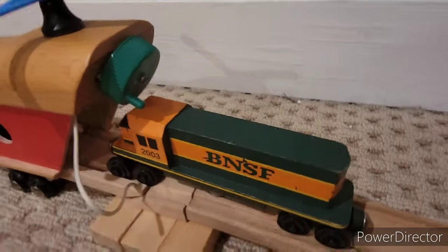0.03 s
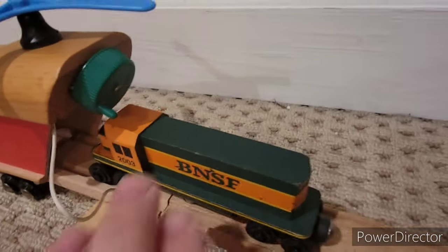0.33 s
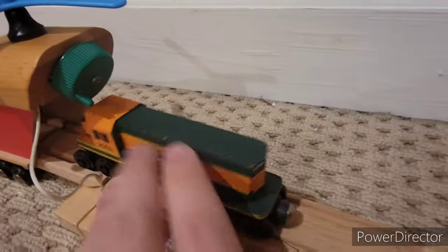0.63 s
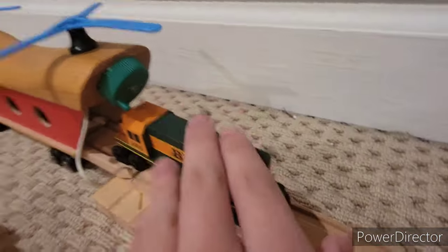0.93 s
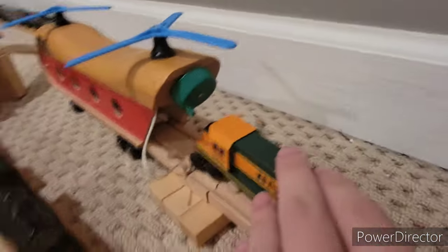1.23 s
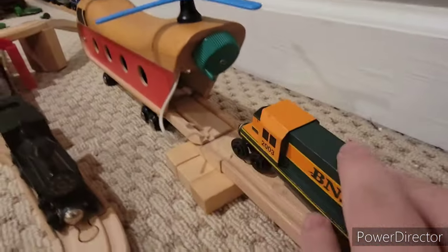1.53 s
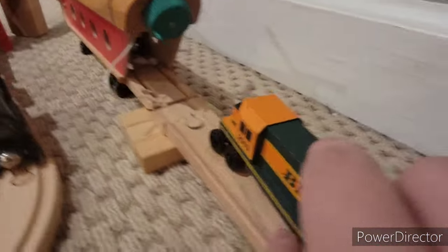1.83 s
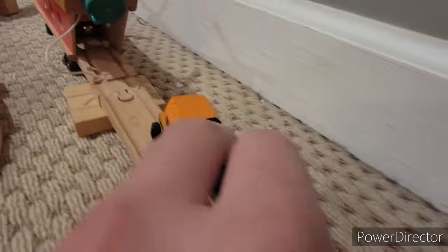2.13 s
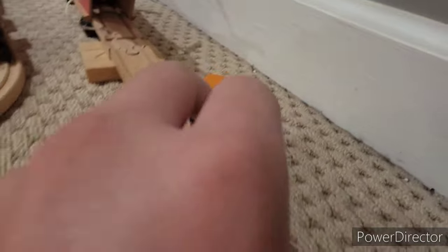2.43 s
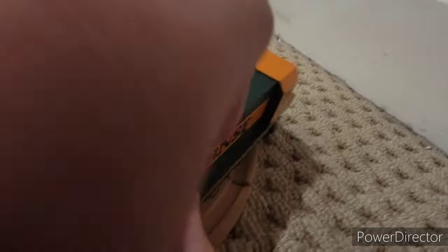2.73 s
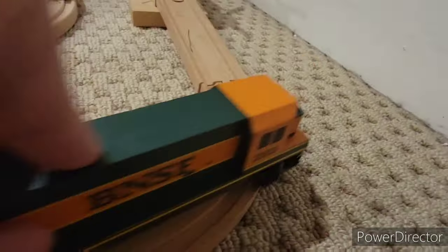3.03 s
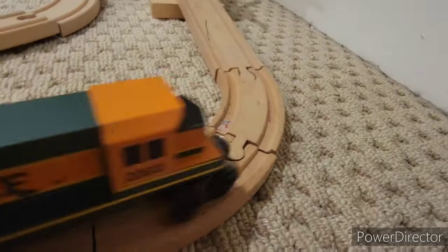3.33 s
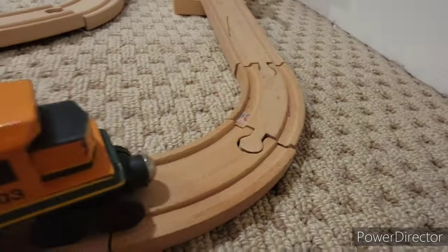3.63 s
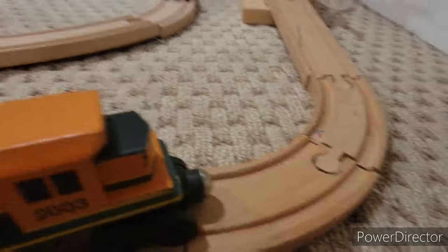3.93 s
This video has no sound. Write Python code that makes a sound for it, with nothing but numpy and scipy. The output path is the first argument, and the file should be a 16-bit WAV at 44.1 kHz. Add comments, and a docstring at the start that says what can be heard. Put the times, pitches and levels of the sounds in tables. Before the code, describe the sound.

A wooden toy train rolls along a wooden track after light handling clicks and a few deep bumps. Its wheels rattle and squeak in fits, knock over a joint, then fade, close by in a quiet carpeted room.

```python
"""A quiet room hums, and a hand brushes and clicks against a wooden toy engine as it takes hold.
From about 1.4 s the hand bears down with deep bumps and pushes the toy closer along a wooden track
on a carpet. The wheels rumble and rattle in their grooves, and from 1.8 s a dry axle squeaks in fits.
Just after 3 s the wheels scrape along a bend. Near 3.4 s they cross a joint with a light knock and
two hard ones, while the squeaks are at their loudest. Then the rolling fades."""
import sys
import numpy as np
from scipy import signal
from scipy.fft import rfft, irfft
from scipy.io import wavfile

SR = 44100
rng = np.random.default_rng(int(sys.argv[2]) if len(sys.argv) > 2 else 0)


def transcribe(u):
    """Save the signal u as a 16-bit wav file named by the first command-line argument.

    u: samples, shape (n,) or (channels, n), limited to [-1, 1]; the rate is SR.
    q: integer samples, one column per channel.
    """
    v = np.clip(np.atleast_2d(u).T, -1, 1)
    q = np.round(v * 32767).astype(np.int16)
    wavfile.write(sys.argv[1], SR, q)


N = 176400
T = np.arange(N) / SR
HZ = np.maximum(np.arange(N // 2 + 1) * SR / N, 1)

# Low rumble of the room: pitch_hz, gain_db
ROOM_COLOUR = [(25, -31), (50, -11), (130, -4), (180, -11.5), (260, -16), (420, -27), (850, -23),
               (1500, -33.5)]
# Low hums of the room, once fully grown: pitch_hz, width_hz, level_db
ROOM_HUMS = [(60.3, 19, -51.5), (103.7, 21, -42.5)]
# Loudness of the faint hiss: time_s, level_db
HISS_LEVELS = [(0, -68.5), (.55, -71.5), (1.4, -61), (2.2, -65.5), (2.7, -52), (3.5, -66), (4, -60)]
# Tone of that hiss: pitch_hz, gain_db
HISS_COLOUR = [(700, 4), (3000, 2), (7000, -3.5), (8500, -22), (15000, -12.5)]
# Brushes of hand and sleeve: peak_s, rise_s, fall_s, level_db, pitch_hz
HAND_BRUSHES = [(.335, 0.068, 0.023, -52.5, 2230), (.68, 0.013, 0.037, -61, 1900),
                (0.794, 0.0094, 0.039, -52, 2880), (1.337, 0.018, 0.0084, -53.5, 4300),
                (2.389, 0.017, 0.023, -46.5, 1240)]
# Bumps, deep as the hand bears down, hollow as a wheel drops: start_s, level_db, pitch_hz
DULL_BUMPS = [(1.417, -30, 69), (1.518, -33.5, 67), (1.6, -31.5, 65.5), (1.843, -34, 523),
              (1.889, -33.5, 442), (1.94, -34, 380), (2.03, -32, 538)]
# Clicks of fingers, couplings and wheels: start_s, level_db, pan_db, ring_hz, ring_db (before a boost)
# In every table, pan_db above 0 is to the left.
WOOD_CLICKS = [(0.779, -32, -0.5, 3570, -5.5), (0.84, -39.5, -5, 3270, -2.5), (1.842, -37.5, -2, 5600, -14),
               (1.891, -43.5, -10, 1810, -3), (1.939, -41, 0, 6310, -16), (2.0297, -33, -4, 2150, -12.5),
               (2.1053, -62, -13, 3950, 18), (2.3786, -34, -15, 1330, -7), (2.524, -27.5, 1, 3350, -15),
               (2.630, -23.5, -2.5, 3730, -13), (2.6928, -38, -4, 7120, 1.5),
               (2.9071, -29.5, -12, 1310, -8), (3.016, -33.5, -11.5, 1420, -2),
               (3.134, -28.5, 2, 3400, -16.5), (3.312, -40, -5, 1960, 4.5)]
# Tone of a click's crack: pitch_hz, gain_db
CLICK_COLOUR = [(200, 15), (480, 16.5), (900, 3.5), (3000, 1), (7000, 1.5), (9000, -22), (15000, -41)]
# Rumble of the wheels in the grooves: time_s, level_db, pan_db
RUMBLE_LEVELS = [(0, -67.5, -9), (1.3, -54.5, -6), (2.45, -46.5, -5.5), (2.65, -38, 1), (2.85, -45, -0.5),
                 (3.42, -37, 2.5), (3.65, -40.5, 4.5), (4, -53, -9)]
# Hollow ringing of the track: pitch_hz, width_hz, gain_db
TRACK_RESONANCES = [(251.6, 30, -4.5), (382.7, 55, 2), (446, 59, -0.5), (539, 30, -4.5)]
# Loudness of the rattle: time_s, level_db
RATTLE_LEVELS = [(0, -93), (1.75, -91), (2.3, -75), (2.48, -56), (2.65, -46), (2.8, -52.5), (3.05, -48),
                 (3.45, -64), (3.62, -45), (3.8, -60), (4, -65.5)]
# Bright ringing of engine and track: pitch_hz, width_hz, gain_db
BODY_RESONANCES = [(1384, 270, -3.5), (1854, 154, 4.5), (2137, 280, 1.5), (2850, 220, -2),
                   (3360, 800, -2.5), (5330, 1400, -14.5), (7080, 290, -6)]
# Knocks on the joint: start_s, length_s, level_db, pan_db, thud_db
JOINT_KNOCKS = [(3.396, 0.0081, -22.5, 2, -27), (3.4614, 0.011, -16.5, 4, -20),
                (3.4916, 0.0096, -11.5, 2.5, -21)]
# Tone of a knock: pitch_hz, gain_db
KNOCK_COLOUR = [(200, 0), (400, 0.5), (750, -22.5), (1400, -5.5), (3500, -4.5), (4500, -11), (5400, -1),
                (7200, -11), (8600, -22.5), (13000, -19.5), (15200, -6.5)]
# Squeaks of the axle: start_s, length_s, start_hz, end_hz, level_db, pan_db,
# roughness (0 is clean, 1 or more is all scratch), sizzle_db (added to level_db)
AXLE_SQUEAKS = [(1.785, 0.021, 4610, 4650, -36, -4, 0.24, -32),
                (1.847, 0.031, 5310, 5000, -40, -7, 0.15, -25), (2.344, 0.1, 5160, 4940, -52, -2, 0.62, -9),
                (2.456, 0.063, 4960, 4790, -47.5, -3.5, 0.54, -8),
                (2.578, 0.063, 5040, 4910, -48.5, 1.5, 1.06, 7.5),
                (2.635, 0.12, 4850, 5080, -51, 3, 1.06, 4), (2.785, 0.14, 4860, 5010, -52.5, 1, 0.85, 0),
                (2.987, 0.081, 4595, 4850, -48, 5, 0.78, -12),
                (3.072, 0.018, 5135, 5190, -31.5, 15, 0.25, -10),
                (3.096, .045, 5205, 5516, -37, 11.5, 0.44, -15),
                (3.37, 0.034, 5317, 5385, -27.5, 18, 0.08, -19),
                (3.401, 0.124, 5383, 5400, -29.5, 23, 0.14, -12),
                (3.575, 0.026, 5380, 5344, -31, 11, .12, -16), (3.61, 0.01, 5350, 5206, -27, 15, 0.37, -7),
                (3.631, 0.016, 5380, 5310, -33, 18, 0.36, -12),
                (3.718, 0.035, 5360, 5290, -34.5, 10, 0.46, -15),
                (3.757, 0.076, 5070, 5120, -49, 3, 0.66, 0)]

SLIPS_PER_S, SLIP_SPREAD_DB = 1100, 1.5
BASS_PAN_DB, LEFT_LEAD_S, TRACK_LEAD_S = -4.5, 0.00036, 0.0006


def from_db(db):
    """Turn decibels into a gain."""
    return 10 ** (np.asarray(db) / 20)


def rms_one(x):
    """Scale a sound to an average strength (rms) of 1."""
    return x / np.sqrt(np.mean(x ** 2) + 1e-20)


def in_time(rows):
    """Join the rows of a table by straight lines over time."""
    times, *columns = np.transpose(rows)
    return [np.interp(T, times, column) for column in columns]


def coloured(x, points):
    """Shape the tone of a sound by a table, fading beyond its ends."""
    hz, db = np.transpose(points)
    edges = 1 / np.sqrt((1 + (hz[0] / HZ) ** 6) * (1 + (HZ / hz[-1] / 1.2) ** 8))
    gain = from_db(np.interp(np.log(HZ), np.log(hz), db))
    return rms_one(irfft(rfft(x) * edges * gain, N))


def low_pass(x, hz, order):
    """Dull the sound above hz."""
    return signal.sosfilt(signal.butter(order, hz, fs=SR, output="sos"), x + 1e-18)


def resonate(x, hz, width_hz):
    """Make a sound ring at one pitch; narrower rings longer."""
    r = np.exp(-np.pi * width_hz / SR)
    feedback = [1, -2 * r * np.cos(2 * np.pi * hz / SR), r * r]
    return signal.lfilter(np.array([1, 0, -1]) * (1 - r * r) / 2, feedback, x + 1e-18)


def drift(rate_hz):
    """A smooth random wobble."""
    return rms_one(irfft(rfft(rng.standard_normal(N)) / (1 + (HZ / rate_hz) ** 2), N))


def stereo_noise(apart):
    """White noise; apart runs from 0 (same in both ears) to 1 (unrelated)."""
    mid, side = rng.standard_normal((2, N))
    return rms_one(mid + apart * side * np.array([[1], [-1]]))


def place(x, pan_db, lead_s=LEFT_LEAD_S):
    """Set a sound left or right; the left ear hears it first."""
    left, right = np.broadcast_to(x, (2, N))
    gain = from_db(pan_db)
    return np.array([left * gain, np.interp(T - lead_s, T, right)]) * np.sqrt(2 / (1 + gain * gain))


def gate(start_s, length_s, rise_s, fall_s):
    """A level that rises, holds, then dies away after length_s."""
    return np.clip((T - start_s) / rise_s, 0, 1) * np.exp(-np.maximum(T - start_s - length_s, 0) / fall_s)


def grains(per_s, spread_db, apart):
    """Tiny random taps of uneven strength."""
    taps = rng.random(N) < per_s / SR
    return taps * from_db(spread_db * np.minimum(rng.exponential(1, N), 4)) * stereo_noise(apart)


def background():
    """The room's rumble and two wavering hums grow at first, beside a faint hiss."""
    low = from_db(-46) * coloured(stereo_noise(apart=0.35), ROOM_COLOUR)
    for hz, width_hz, db in ROOM_HUMS:
        spectrum = rfft(stereo_noise(apart=0.036)) / (1 + ((HZ - hz) / width_hz * 2) ** 2)
        low = low + from_db(db) * rms_one(irfft(spectrum, N))
    growth = from_db(np.interp(T, [0, 1.82], [-5, 0]))
    hiss = from_db(in_time(HISS_LEVELS)[0]) * coloured(stereo_noise(apart=1), HISS_COLOUR)
    return place(low * growth, BASS_PAN_DB) + place(hiss, pan_db=-6)


def room_echo(x, fade_s=0.14, level_db=-13.5):
    """A carpeted room gives a short, dull echo."""
    t = T[:SR // 2]
    tail = rng.standard_normal((2, len(t))) * from_db(-60 * t / fade_s) * (t > 0.004)
    tail = low_pass(tail, hz=7000, order=2)
    tail = tail / np.sqrt(np.sum(tail ** 2, axis=1, keepdims=True))
    both_sides = (x + x[::-1]) / np.sqrt(2)
    return from_db(level_db) * signal.fftconvolve(both_sides, tail, axes=1)[:, :N]


def hand_brushes():
    """Skin and cloth swish over carpet and wood."""
    friction = low_pass(grains(per_s=6800, spread_db=3, apart=1), hz=7500, order=6)
    out = 0
    for peak_s, rise_s, fall_s, db, hz in HAND_BRUSHES:
        swell = np.exp(-np.maximum((peak_s - T) / rise_s, (T - peak_s) / fall_s))
        out += from_db(db) * swell * rms_one(resonate(friction, hz, width_hz=0.75 * hz))
    return place(out, pan_db=-5)


def dull_bumps(rise_cycles=1.06):
    """A soft blow swells in about one cycle and dies in a few more."""
    out = 0
    for start_s, db, hz in DULL_BUMPS:
        cycles = np.maximum(T - start_s, 0) * hz
        swell = cycles / rise_cycles * np.exp(1 - cycles / rise_cycles)
        out += from_db(db) * swell * np.sin(2 * np.pi * cycles)
    return place(out, BASS_PAN_DB)


def wood_clicks(rise_s=0.00043, fall_s=0.0026, ring_width_hz=240, ring_boost_db=14.5):
    """Each click is a short crack of wood with its own ringing note."""
    crack = coloured(stereo_noise(apart=1), CLICK_COLOUR)
    out = 0
    for start_s, db, pan_db, hz, ring_db in WOOD_CLICKS:
        age = np.maximum(T - start_s, 0)
        ring_level = from_db(ring_db + ring_boost_db) * np.exp(-np.pi * ring_width_hz * age)
        ring = ring_level * np.sin(2 * np.pi * hz * age)
        burst = crack * np.exp(-age / fall_s)
        out += place(from_db(db) * np.clip(age / rise_s, 0, 1) * (burst + ring), pan_db)
    return out


def bend_scrape(hz=1800, width_hz=390, level_db=-50.5):
    """In the bend the wheels rub the groove's wall and keep it ringing."""
    rub = resonate(stereo_noise(apart=0.88), hz, width_hz)
    rub = rms_one(resonate(rub, hz, width_hz))
    swell = gate(start_s=3.08, length_s=0.38, rise_s=0.029, fall_s=0.13)
    return place(from_db(level_db) * swell * rub, pan_db=-9)


def wheel_rumble():
    """Rolling over the grain of the wood shakes the track."""
    level_db, pan_db = in_time(RUMBLE_LEVELS)
    jolts = low_pass(grains(per_s=220, spread_db=1.5, apart=0.34), hz=696, order=2)
    rumble = sum(from_db(db) * resonate(jolts, hz, width) for hz, width, db in TRACK_RESONANCES)
    return place(rms_one(rumble) * from_db(level_db), pan_db, TRACK_LEAD_S)


def wheel_rattle(flicker_db=2.8):
    """The grain of the wood also shakes the loose wheels and body."""
    taps = grains(per_s=1500, spread_db=2.2, apart=0.57) * from_db(flicker_db * drift(rate_hz=26))
    rattle = sum((-1) ** k * from_db(db) * resonate(taps, hz, width)
                 for k, (hz, width, db) in enumerate(BODY_RESONANCES))
    rattle = low_pass(rms_one(rattle), hz=8000, order=6)
    return place(rattle * from_db(in_time(RATTLE_LEVELS)[0]), pan_db=0.63)


def joint_knocks(thud_hz=375, thud_fade_s=0.038, shake_db=-23.5):
    """The wheels chatter across the joint, the track thuds, and loose parts shake on."""
    chatter = coloured(stereo_noise(apart=0.89), KNOCK_COLOUR)
    loose_parts = coloured(grains(SLIPS_PER_S, SLIP_SPREAD_DB, apart=1), KNOCK_COLOUR)
    out = 0
    for start_s, length_s, db, pan_db, thud_db in JOINT_KNOCKS:
        age = np.maximum(T - start_s, 0)
        hit = chatter * np.sin(np.pi * np.clip(age / length_s, 0, 1))
        shake = loose_parts * from_db(shake_db) * gate(start_s, length_s, rise_s=0.002, fall_s=0.047)
        thud_level = 2 * np.clip(age / length_s, 0, 1) * from_db(thud_db - 60 * age / thud_fade_s)
        thud = thud_level * np.sin(2 * np.pi * thud_hz * age)
        out += place(from_db(db) * (hit + shake), pan_db) + place(thud, pan_db, TRACK_LEAD_S)
    return out


def rasp(phase, damping_hz):
    """A scratchy note: each uneven slip sets it ringing for a moment."""
    r = np.exp(-2 * np.pi * damping_hz / SR)
    slips = grains(SLIPS_PER_S, SLIP_SPREAD_DB, apart=0.5) * np.exp(2j * np.pi * rng.random(N))
    swells = signal.lfilter([1], [1, -2 * r, r * r], slips + 1e-18)
    return rms_one(np.real(swells * np.exp(1j * phase)))


def axle_squeaks(rise_s=0.0049, fall_s=0.0074, wobble_hz=35.9, rough_wobble_hz=70, flutter_db=0.65):
    """The dry axle sticks and slips, so it squeals; light contact breaks the note into scratches."""
    points = []
    for start_s, length_s, start_hz, end_hz, _, _, rough, _ in AXLE_SQUEAKS:
        points += [(start_s, start_hz, rough), (start_s + length_s, end_hz, rough)]
    hz, roughness = in_time(sorted(points))
    hz = hz + (wobble_hz + rough_wobble_hz * roughness) * drift(rate_hz=30)
    phase = 2 * np.pi * np.cumsum(hz) / SR
    usual_hz = np.mean(np.array(AXLE_SQUEAKS)[:, 2])
    sizzle_hz = 15120 + 0.8 * (hz - usual_hz)  # a very high sizzle follows the note
    clean = np.sqrt(2) * np.sin(phase)
    scratch = rasp(phase, damping_hz=190)
    octave = rasp(2 * phase, damping_hz=380)
    sizzle = rasp(2 * np.pi * np.cumsum(sizzle_hz) / SR, damping_hz=285)
    flutter = from_db(flutter_db * drift(rate_hz=150))
    out = 0
    for start_s, length_s, _, _, db, pan_db, rough, sizzle_db in AXLE_SQUEAKS:
        rough = np.clip(rough, 0, 1)
        level = from_db(db) * flutter * gate(start_s, length_s - fall_s, rise_s, fall_s)
        octave_db = -29.5 + 22 * rough
        tone = np.sqrt(1 - rough) * clean + np.sqrt(rough) * scratch + from_db(octave_db) * octave
        out += place(level * tone, pan_db) + place(level * from_db(sizzle_db) * sizzle, pan_db=0.67)
    return out


def scene():
    """The toy, its echo and the quiet room."""
    toy = axle_squeaks() + wheel_rumble() + wheel_rattle() + bend_scrape()
    toy += wood_clicks() + joint_knocks() + dull_bumps() + hand_brushes()
    return toy + room_echo(toy) + background()


def record(dry, cutoff_hz=15450):
    """Clip any peaks at full scale and cut the highest treble."""
    return signal.sosfilt(signal.ellip(10, 0.2, 80, cutoff_hz, fs=SR, output="sos"), np.clip(dry, -1, 1))


dry = scene()
out = record(dry)
transcribe(out)
```